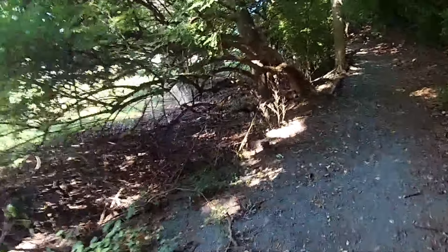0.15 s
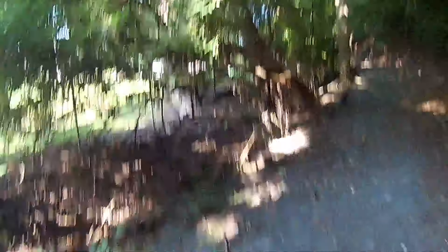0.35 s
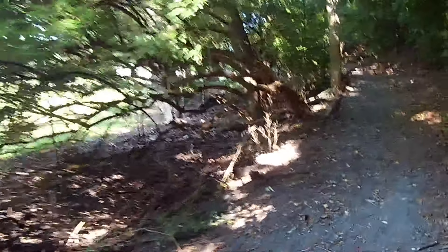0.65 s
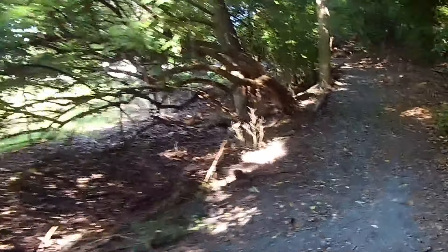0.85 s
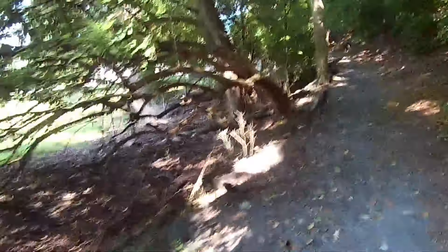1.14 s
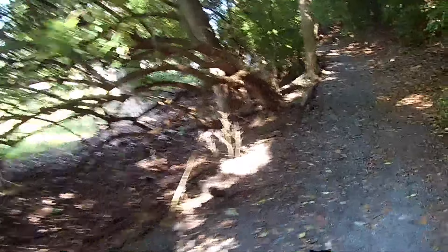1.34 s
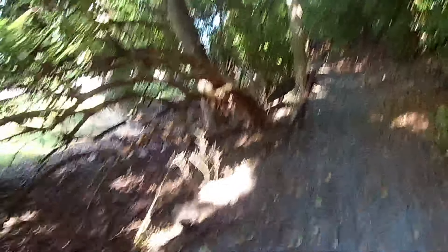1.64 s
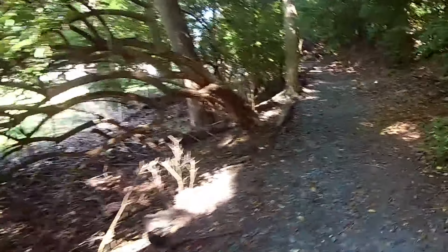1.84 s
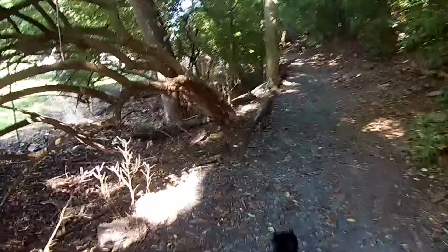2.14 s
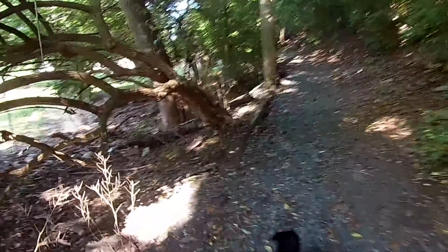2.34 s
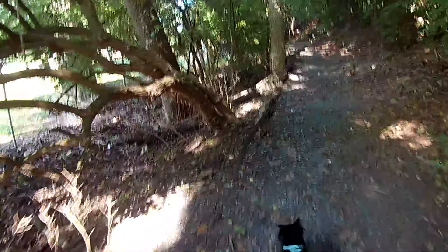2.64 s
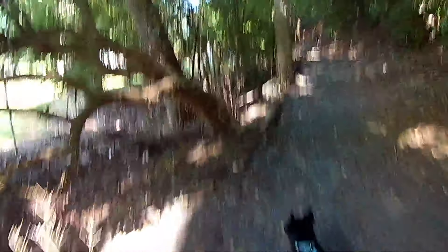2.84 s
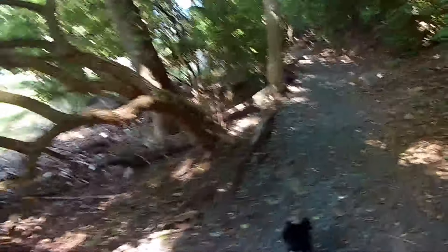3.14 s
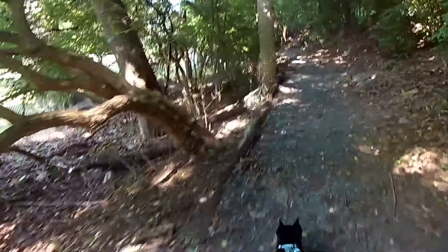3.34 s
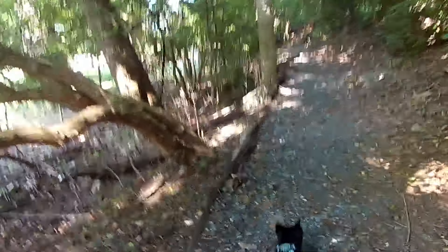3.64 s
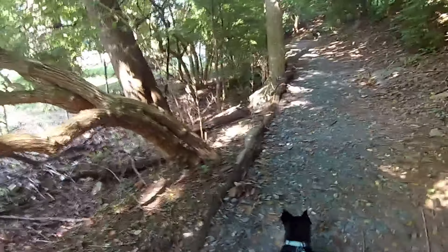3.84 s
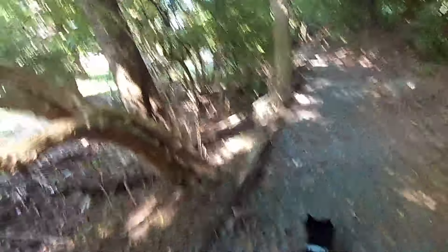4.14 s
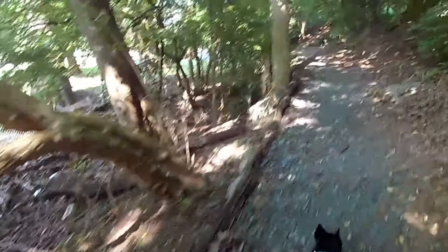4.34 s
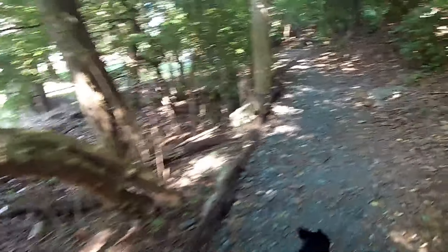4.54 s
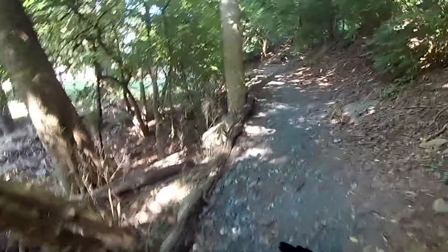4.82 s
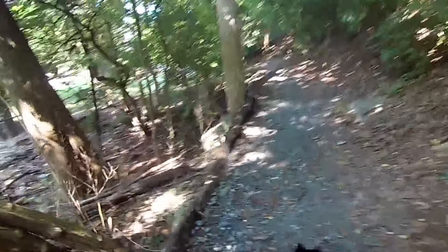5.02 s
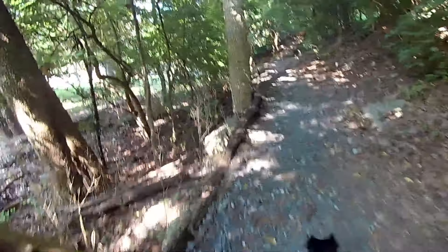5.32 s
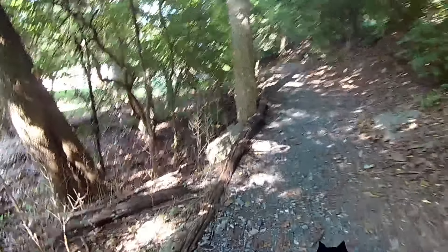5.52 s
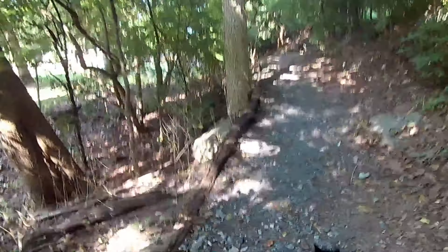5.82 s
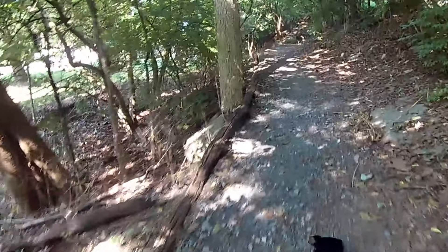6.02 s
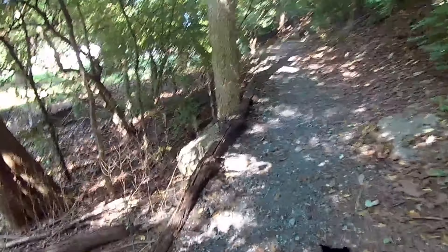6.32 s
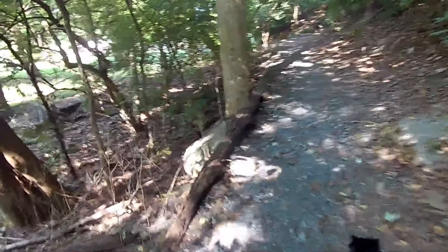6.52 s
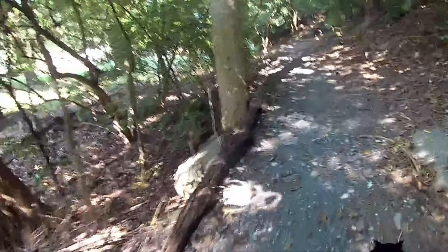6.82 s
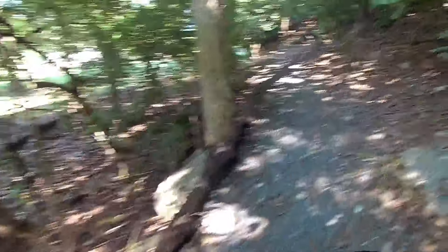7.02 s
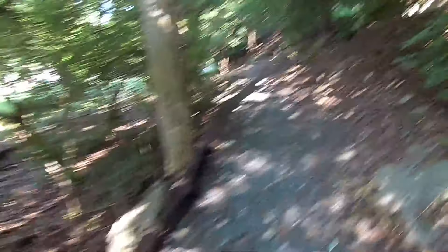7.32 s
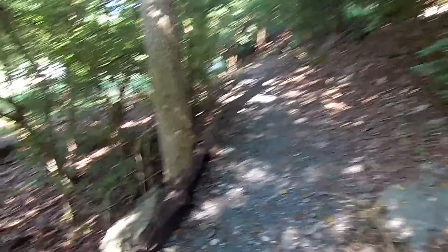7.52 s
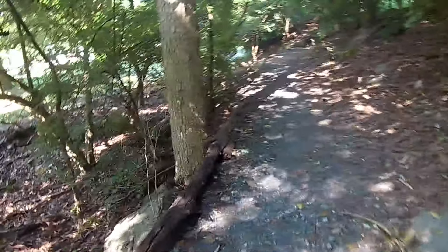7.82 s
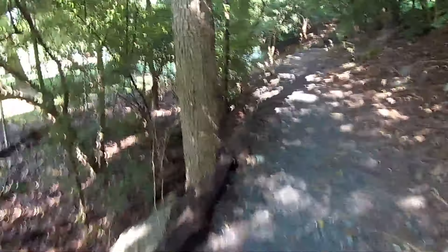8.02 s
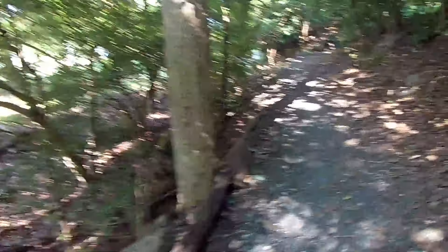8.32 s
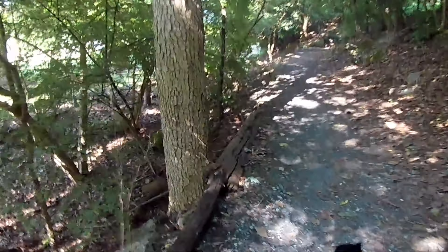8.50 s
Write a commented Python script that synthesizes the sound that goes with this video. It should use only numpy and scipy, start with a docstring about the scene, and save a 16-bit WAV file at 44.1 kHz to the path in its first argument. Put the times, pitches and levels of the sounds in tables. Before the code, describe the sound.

Heard through a covered microphone carried by the walker, even steps grind and crackle on a gravelly woodland path, about three every two seconds. Early on, a small metal tag on a leash gives a faint tink, and past the middle one stone snaps louder than the rest. The slightly dull crunching continues throughout, over a thin high hiss and a barely audible drone of far engines.

```python
"""A gravel trail under trees, where a walker is heard through the closed housing of a small camera.
Each step grinds a crowd of small stones, each a damped resonator, and snaps a few larger ones.
The housing acts as a low-pass filter on the crunch. A metal tag on a leash tinks in its free modes.
Under it lies the air of the woods: a far rumble with two engine drones, a thin broad hiss
and flickering bands of high hiss near 4 and 6 kHz."""
import sys
import numpy as np
from scipy import signal
from scipy.fft import rfft, irfft, next_fast_len
from scipy.io import wavfile

SR = 44100
rng = np.random.default_rng(int(sys.argv[2]) if len(sys.argv) > 2 else 0)


def bounce(signal):
    """Save signal as a 16-bit WAV file at the path given by the first command-line argument."""
    frames = np.transpose(np.atleast_2d(signal))
    limited = np.clip(frames, -1, 1)
    pcm = np.round(limited * 32767).astype(np.int16)
    wavfile.write(sys.argv[1], SR, pcm)


N = 381906

# wavering level of the low background noise: time_s, level_db
LOW_NOISE_LEVELS = [(0, -67), (.9, -67), (1.8, -71), (3.2, -65.5), (5.5, -73), (6.2, -62), (7.6, -64),
                    (8.66, -63)]
# two far engine drones: time_s, lower_hz, lower_db, upper_hz, upper_db
ENGINE_DRONES = [(0, 56, -63, 93.5, -66), (.7, 58, -62, 97, -64), (1, 57.3, -66, 106, -63.5),
                 (2.2, 74, -70, 106, -64.5), (2.8, 77.3, -65, 106, -66), (3.6, 70.4, -74, 107.7, -63.5),
                 (5.7, 56.5, -76, 115.7, -72.5), (6.5, 57.7, -66, 120.2, -63), (7.3, 57.96, -78, 97, -63),
                 (8.66, 60, -74, 93, -65)]
# spectrum of the air of the woods: frequency_hz, relative_density_db
AIR_SPECTRUM = [(12, -47), (20, -2.5), (53, -0.5), (100, -3), (160, -7), (300, -14), (600, -14.5),
                (1500, -14), (2200, -18), (3200, -20), (5000, -22.5), (7000, -29), (7800, -45.5),
                (8600, -44.5), (15500, -47)]
# bands in which stirring leaves vary the hiss: edge_hz
LEAF_BAND_EDGES = [400, 900, 1600, 2300, 3000, 3700, 5000, 7500]
# three flickering bands of high hiss: centre_hz, width_hz
HISS_BANDS = [(3750, 350), (4240, 500), (6050, 750)]
# levels of those bands: time_s, low_band_db, middle_band_db, high_band_db
HISS_LEVELS = [(0, -71.5, -63, -69.5), (.55, -75, -61.5, -74.5), (.75, -65, -61.5, -70.5),
               (1.3, -70, -63, -73), (1.6, -88, -63.5, -73.5), (2.5, -77, -66, -74.5),
               (3.1, -75, -64.5, -74.5), (3.68, -75, -61.5, -71), (3.759, -81, -66, -71.5),
               (4.799, -86, -65, -70), (5.2, -87, -64, -70), (5.7, -86, -62, -67),
               (6.299, -84, -64.5, -71.5), (7.1, -78, -64, -70), (8.2, -76, -63.5, -67),
               (8.66, -76, -63.5, -66.5)]
# blows on the metal tag: start_s, level_db
TAG_STRIKES = [(2.2732, -57.5), (2.2873, -67), (2.261, -75), (2.353, -75), (3.868, -81), (4.7815, -81)]
# free modes of the tag: pitch_hz, gain_db, t60_s
TAG_MODES = [(5900, 1, 0.094), (6090, 3.5, 0.12), (9930, -1, 0.063), (9992, 0, 0.12), (10160, -7, .06),
             (9400, -13, .04), (11650, -17, .04), (12400, -17, .03)]
# dry ticks close by: start_s, peak_db, rise_ms
DRY_TICKS = [(1.035, -85, 15), (1.6, -88, 15), (2.2114, -84, 6), (3.8681, -84, 9), (4.343, -77, 8),
             (4.4268, -82, 6), (4.7815, -87, 9), (5.3602, -89, 9), (5.565, -81, 20), (5.6825, -85, 8),
             (6.41, -76, 8.8), (6.8339, -85, 8), (8.0481, -81, 9), (8.1703, -75, 11)]
# footfalls, with rise and fall spanning 20 dB and the pitch given at mid hold:
# full_load_s, hold_s, grit_db, rise_s, fall_s, pitch_hz, heel_db
FOOTFALLS = [(0.364, 0.074, -47.5, 0.055, 0.11, 1230, -51.5), (1.025, 0.03, -43.5, 0.1, 0.032, 1260, -73),
             (1.606, 0.057, -44.5, 0.033, 0.14, 1190, -49.5), (2.227, 0.018, -43, 0.055, 0.13, 1360, -56),
             (2.799, 0.11, -47, 0.025, 0.09, 1114, -52.5), (3.472, 0.0055, -45, 0.0804, 0.099, 1040, -55),
             (4.037, 0.11, -46, 0.032, 0.097, 810, -47), (4.747, .005, -41.5, 0.051, 0.076, 960, -52.5),
             (5.367, 0.059, -44, 0.03, 0.11, 950, -54), (6.019, 0.038, -44, 0.032, 0.1, 920, -48.5),
             (6.67, 0.066, -47.5, 0.13, 0.2, 970, -47.5), (7.345, 0.0071, -46, 0.036, 0.29, 1220, -60),
             (7.988, 0.046, -47, 0.071, 0.047, 1040, -54), (8.586, 0.025, -56.5, 0.051, 0.089, 1200, -78)]
# further bursts of grit: middle_s, grit_db, fade_s, pitch_hz
# (fade_s spans 20 dB on either side and counts as at least 0.02 s)
# The brief one at 6.425 s surrounds a loud snap; the others are scuffs of the sole or toe.
GRIT_BURSTS = [(.5, -47.5, 0.13, 1250), (1.107, -49.5, 0.08, 1300), (1.458, -55, -0.7, 870),
               (1.76, -59, 0.5, 1250), (2.315, -47, -0.04, 1490), (2.36, -53.5, 0.58, 1630),
               (2.613, -80, 1, 940), (3.246, -50.5, 0.05, 965), (3.57, -49.5, -0.01, 1210),
               (3.991, -50, -0.48, 1100), (4.354, -64.5, 0.6, 1190), (4.857, -45, -0.22, 1220),
               (5.31, -54, -0.43, 1060), (5.585, -48, -0.14, 1430), (5.959, -48.5, -0.01, 1220),
               (6.164, -54, 0.23, 1130), (6.425, -42, 0, 1240), (6.777, -37.5, 0.0137, 1040),
               (6.84, -46.5, 0, 1160), (7.26, -58, 0.36, 1100), (7.48, -50, -0.14, 1450),
               (8.089, -46, 0.07, 1100)]
# larger stones and twigs snapping: time_s, body_db, pitch_hz, length_ms, edge_db
STONE_SNAPS = [(.034, -36.5, 1370, 1.1, -43), (0.27, -32, 1410, 1.04, -44), (0.301, -35.5, 1230, 0.56, -38),
               (0.356, -37, 1550, 1.4, -40), (0.4012, -34, 800, 0.71, -40), (0.39, -27, 1320, 0.39, -27),
               (0.422, -28, 1310, 0.36, -36), (0.4407, -19.5, 960, 0.67, -19),
               (0.4493, -23, 1300, 0.5, -38), (0.4724, -33, 1510, .88, -37), (.4865, -37, 1850, 1.2, -35),
               (0.502, -29, 1180, 0.36, -31), (.51, -28, 1280, 2.4, -11), (0.5165, -23, 1220, 0.53, -7),
               (.541, -25.5, 1420, 0.62, -33), (0.6209, -35.5, 1610, 1, -35), (.709, -41.5, 1950, 1.6, -35),
               (0.8637, -37, 1450, 0.44, -35), (0.986, -39, 1280, 0.5, -14), (1.0088, -19, 1693, 0.52, -25),
               (1.022, -32, 1510, 0.81, -30), (1.0285, -33, 1300, 0.43, -35), (1.038, -27, 990, 0.55, -35),
               (1.0468, -27, 1500, 0.73, -9), (1.0575, -34, 1100, 0.77, -28), (1.069, -40, 1600, 0.93, -24),
               (1.0496, -21.5, 970, 0.91, -11), (1.094, -28.5, 1400, 1.1, -35),
               (1.1053, -27.5, 1350, 0.8, -11), (1.2025, -34.5, 1010, 1.2, -38), (1.4, -30, 980, 0.84, -34),
               (1.5466, -28, 1440, 0.91, -35), (1.591, -39, 850, 0.64, -35), (1.6152, -30, 900, 2.2, -32),
               (1.627, -24.5, 900, 0.72, -38), (1.645, -29, 1110, 0.75, -38), (1.683, -37, 1410, 1.3, -24),
               (1.7472, -44, 1100, 0.86, -40), (1.6613, -27.5, 1050, 1.2, -41),
               (1.6943, -27, 1140, 1.35, -13), (1.7102, -31, 1660, 0.8, -15),
               (1.7675, -36.5, 1210, .97, -41), (2.185, -29, 1640, 0.51, -44),
               (2.213, -22, 1400, 0.89, -45), (2.2261, -29, 1540, 0.82, -36), (2.235, -29, 1590, 1.1, -39),
               (2.2555, -42, 1400, 0.77, -38), (2.3638, -36, 1400, 1.4, -38), (2.391, -38, 1510, 1.2, -36),
               (2.4678, -39.5, 1380, 0.89, -35), (2.611, -40, 1220, 0.91, -49),
               (2.6946, -34.5, 1310, .93, -40), (2.7538, -34, 1170, .92, -39),
               (2.8003, -36, 1400, 0.81, -40), (2.849, -33, 1200, 0.55, -40),
               (2.8254, -30.5, 960, 1.3, -38), (2.888, -34, 1140, 3, -42), (2.9169, -36, 1220, 0.73, -41),
               (2.9348, -34.5, 1450, 2.3, -37), (3.453, -37, 1910, 0.91, -35),
               (3.555, -41, 1900, 0.88, -35), (3.245, -31.5, 865, 0.36, -43), (3.312, -35, 1278, 0.69, -35),
               (3.4884, -29, 694, 1.6, -39), (3.497, -25, 1530, 0.59, -36), (4.033, -38.5, 970, 4.6, -39.5),
               (4.0445, -25, 765, 0.69, -40), (4.074, -40, 900, 2, -32), (4.13, -33, 1200, 1.7, -35),
               (4.1755, -40, 1200, 1.7, -40), (4.0846, -23, 970, 0.76, -17),
               (4.1187, -32.5, 1110, 5.3, -18), (4.1488, -32, 1090, 3.2, -38),
               (4.1936, -33.5, 1240, 1.4, -38), (4.3517, -42, 1490, 0.79, -14),
               (4.357, -36, 1490, 1.2, -8.5), (4.3726, -35.5, 1230, 0.66, -35),
               (4.4605, -47, 1590, 1.1, -42), (4.559, -39, 1396, .9, -38), (4.637, -38, 1430, 0.48, -42),
               (4.821, -38, 1400, 0.6, -42), (4.5913, -40, 1300, .8, -41), (4.682, -39, 1660, 0.58, -38),
               (4.749, -20, 1050, 0.44, -36), (4.7592, -20.5, 1230, 0.85, -39),
               (4.775, -25.5, 1050, 0.75, -46), (4.853, -27.5, 1630, 0.33, -14),
               (4.9436, -38.5, 1520, 0.75, -42), (5.2057, -29.5, 1470, 1, -42),
               (5.273, -24.5, 1090, 1.25, -44), (5.358, -37, 1500, 1.2, -40), (5.368, -32, 610, 4.7, -34),
               (5.3782, -26, 1000, 0.37, -36), (5.388, -35, 1700, 0.55, -35),
               (5.3985, -26.5, 1090, 0.86, -37), (5.4097, -26.5, 740, 0.87, -35),
               (5.429, -28, 1500, .45, -19), (5.438, -22.5, 1220, 1.8, -36), (5.455, -33, 1800, .5, -28),
               (5.4625, -32, 1300, 0.48, -35), (5.514, -33, 895, 1.7, -40), (5.48, -29, 1140, 0.67, -14),
               (5.5215, -28, 1050, 0.7, -13), (5.817, -30, 780, 1.15, -45), (5.8735, -36, 1800, 0.91, -34),
               (5.9654, -34.5, 1320, 0.79, -39), (6.015, -37, 935, 3.5, -38),
               (6.0524, -29, 1180, 0.89, -40), (6.0655, -34, 950, 1.5, -40), (6.0738, -28, 710, 1.8, -42),
               (6.0835, -30, 1060, 0.99, -40), (6.034, -26.5, 895, 0.4, -40), (6.1225, -35, 1210, 1.2, -40),
               (6.138, -34, 1200, .9, -40), (6.19, -39.5, 2160, 0.86, -24), (6.306, -41, 1150, 1.3, -44),
               (6.376, -37, 1010, 1.23, -44), (6.166, -31, 1190, 0.96, -18),
               (6.2936, -42.5, 1040, 2.4, -44), (6.4236, -14, 1200, 0.84, -47),
               (6.4791, -34, 1060, 0.87, -36), (6.5134, -27.5, 910, 1.5, -34),
               (6.514, -33.5, 1890, 1.5, -34), (6.534, -18, 1160, 0.61, -38), (6.654, -34, 690, 1.5, -38),
               (6.662, -37, 650, 1.1, -44), (6.7017, -29, 1200, 0.89, -40), (6.756, -31, 1100, 1, -40),
               (6.795, -28, 1110, 0.97, -40), (6.6829, -27.5, 864, 0.99, -26),
               (6.6971, -24.5, 1020, 0.65, -14), (6.7145, -29.5, 940, 1.3, -41),
               (6.761, -22.5, 1020, 1.4, -38), (6.767, -23, 1150, 0.72, -41),
               (6.777, -25.5, 1080, 0.93, -40), (6.7862, -18.5, 785, 0.95, -34),
               (6.83, -28, 920, 0.45, -37), (6.836, -32, 990, 0.45, -16), (7.1652, -31, 1190, 0.84, -37),
               (7.2074, -38, 674, 1.6, -36), (7.2246, -26, 1470, 0.54, -34), (7.243, -33, 1280, 0.79, -35),
               (7.2614, -32.5, 960, 0.78, -44), (7.292, -36, 1100, 0.83, -38),
               (7.2955, -31, 1220, 0.88, -34), (7.3198, -28.5, 1020, 0.38, -43),
               (7.33, -37, 1094, 0.91, -40), (7.3503, -29, 910, 1.7, -20), (7.3646, -23, 895, 1, -14),
               (7.377, -29, 1430, 0.61, -11), (7.388, -37, 1500, 0.83, -14),
               (7.4208, -29.5, 1325, 0.66, -20), (7.4356, -35, 1190, 2.3, -37),
               (7.473, -36, 1710, 0.77, -13), (7.481, -33, 1470, 0.63, -40), (7.46, -35, 1100, 0.69, -42),
               (7.487, -37.5, 1200, 1, -40), (7.5158, -31.5, 2100, 0.88, -39),
               (7.916, -33.5, 1230, 0.95, -39), (7.949, -33, 1096, 1.1, -46), (7.955, -31, 1140, 1.6, -41),
               (7.977, -35, 1600, .6, -30), (7.9985, -44, 900, 2, -44), (8.022, -29, 900, .8, -40),
               (8.029, -33, 905, 1.3, -42), (8.0405, -32, 1300, 0.88, -40),
               (8.0516, -19.5, 1500, 0.61, -30), (8.077, -31, 1330, 0.49, -16),
               (8.0875, -27, 860, 1.4, -40), (8.1045, -22.5, 1270, 1.3, -38), (8.125, -33, 1220, 1.4, -37),
               (8.141, -34, 1300, 1, -40), (8.556, -38, 1410, 0.94, -40), (8.568, -40.5, 1300, 0.62, -40),
               (8.627, -41, 1700, 0.64, -36), (8.5911, -29, 1390, 0.64, -28)]


def amp(db):
    """Amplitude grows tenfold for every 20 dB."""
    return 10 ** (np.asarray(db) / 20)


def unit_rms(x):
    """Division by the rms value gives a signal unit power."""
    return x / np.sqrt(np.mean(x ** 2) + 1e-20)


def curves(rows):
    """Linear interpolation in time turns each later column into one value per sample."""
    times_s, *columns = np.transpose(rows)
    return [np.interp(np.arange(N) / SR, times_s, column) for column in columns]


def drift(rate_hz):
    """Low-pass filtered noise fluctuates slowly, here with unit rms."""
    hop, run_in = 40, 2000
    pole = np.exp(-2 * np.pi * hop * rate_hz / SR)
    noise = rng.standard_normal(N // hop + run_in + 2)
    slow = signal.lfilter([1], [1, -2 * pole, pole * pole], noise)[run_in:]
    return np.interp(np.arange(N) / hop, np.arange(len(slow)), unit_rms(slow))


def ring(force, hz, t60_s):
    """A damped resonator answers a unit impulse with a sine decaying from height 1."""
    radius, angle = amp(-60 / (t60_s * SR)), 2 * np.pi * hz / SR
    return signal.lfilter([0, np.sin(angle)], [1, -2 * radius * np.cos(angle), radius ** 2], force + 1e-18)


def band(x, low_hz, high_hz, order=2):
    """A Butterworth band-pass attenuates what lies outside its two edges."""
    return signal.sosfilt(signal.butter(order, [low_hz, high_hz], "band", fs=SR, output="sos"), x)


def far_rumble(waver_hz=2.7):
    """Random modulation broadens two gliding engine tones within a band of low noise."""
    level_db, = curves(LOW_NOISE_LEVELS)
    lower_hz, lower_db, upper_hz, upper_db = curves(ENGINE_DRONES)
    out = amp(level_db) * unit_rms(band(rng.standard_normal(N), 61, 103))
    for hz, db in ((lower_hz, lower_db), (upper_hz, upper_db)):
        phase = 2 * np.pi * np.cumsum(hz) / SR
        in_phase, quadrature = 1 + .35 * drift(waver_hz), .35 * drift(waver_hz)
        out += amp(db) * (in_phase * np.sin(phase) + quadrature * np.cos(phase))
    return out


def woodland_air(level_db, flutter_db):
    """Broadband noise, coloured by the housing, is modulated band by band as leaves stir."""
    size = next_fast_len(N)
    hz = np.maximum(np.arange(size // 2 + 1) * SR / size, 1)
    knots_hz, density_db = np.transpose(AIR_SPECTRUM)
    colour = amp(np.interp(np.log(hz), np.log(knots_hz), density_db))
    spectrum = rfft(rng.standard_normal(size)) * colour
    out = irfft(spectrum, size)[:N]
    for low_hz, high_hz in zip(LEAF_BAND_EDGES, LEAF_BAND_EDGES[1:]):
        leaves = irfft(spectrum * (hz >= low_hz) * (hz < high_hz), size)[:N]
        out += leaves * (amp(flutter_db * drift(14)) - 1)
    return amp(level_db) * unit_rms(out)


def high_hiss():
    """Random amplitude modulation makes three bands of noise near 4 and 6 kHz flicker."""
    out = 0
    for level_db, (hz, width_hz) in zip(curves(HISS_LEVELS), HISS_BANDS):
        hiss = band(rng.standard_normal(N), hz - width_hz / 2, hz + width_hz / 2, order=1)
        hiss = band(hiss, hz - width_hz, hz + 0.79 * width_hz)
        out += amp(level_db + 1.73 * drift(22)) * unit_rms(hiss)
    return out


def leash_tag(contact_s=0.0015):
    """A struck metal tag rings in inharmonic modes, which build up over the contact time."""
    blows = np.zeros(N)
    for start_s, db in TAG_STRIKES:
        blows[round(start_s * SR)] = amp(db)
    out = 0
    for hz, db, t60_s in TAG_MODES:
        # spread the blow in time while keeping the height of the ring
        force = 2 / (contact_s * SR) * ring(blows, hz, np.log(1000) * contact_s)
        out += amp(db) * ring(force, hz, t60_s)
    return out


def ground_and_housing(x, delay_s=0.001166, reflection_db=-19, cutoff_hz=2330):
    """Ground reflection adds a delayed copy; the housing transmits little above its cutoff."""
    reflection = amp(reflection_db) * np.interp(np.arange(N) - delay_s * SR, np.arange(N), x)
    return signal.sosfilt(signal.butter(5, cutoff_hz, fs=SR, output="sos"), x + reflection)


def pressing(t, db, rise_s, fall_s, hold_s=0):
    """Power grows exponentially up to t = 0, holds and decays; rise_s and fall_s each span 20 dB."""
    drop_db = 20 * np.maximum(-t / rise_s, (t - hold_s) / fall_s).clip(0, 5)
    return amp(2 * (db - drop_db))


def gait(roll_octaves_per_s=4.5, roll_s=0.72, hop=32):
    """Incoherent powers add, giving grit level, power-weighted mean pitch and tread level."""
    t = np.arange(0, N + hop, hop) / SR
    power, heel_power = amp(2 * -76.5), amp(2 * -68.5)   # the ground settling between steps
    weighted_hz = power * 1300
    for load_s, hold_s, db, rise_s, fall_s, hz, heel_db in FOOTFALLS:
        age_s = t - load_s
        step = pressing(age_s, db, rise_s, fall_s, hold_s)
        # the pitch rises as the foot rolls from heel to toe
        rolled_hz = hz * 2 ** (roll_octaves_per_s * (age_s.clip(0, roll_s) - hold_s / 2))
        power += step
        weighted_hz += step * rolled_hz
        heel_power += pressing(age_s, heel_db, rise_s=0.021, fall_s=0.11)
    for middle_s, db, fade_s, hz in GRIT_BURSTS:
        fade_s = max(fade_s, .02)
        burst = pressing(t - middle_s, db, fade_s, fade_s)
        power += burst
        weighted_hz += burst * hz
    return curves(np.transpose([t, 10 * np.log10(power), weighted_hz / power, 10 * np.log10(heel_power)]))


def rustle(grit_db):
    """Leakage past the housing admits faint treble from each step and from dry ticks close by."""
    t = np.arange(N) / SR
    envelope = amp(grit_db - 42.5)
    for start_s, db, rise_ms in DRY_TICKS:
        age = np.maximum(t - start_s, 0) * 1000 / rise_ms
        envelope += amp(db) * age * np.exp(1 - age)
    return envelope * unit_rms(band(rng.standard_normal(N), 7700, 12300))


def tread(level_db):
    """Ground settling under the foot's weight radiates dull, uneven low-frequency noise."""
    return amp(level_db + 0.92 * drift(30)) * unit_rms(band(rng.standard_normal(N), 134, 410))


def snaps(size=768):
    """A sudden release of stress gives a swing or two of the ground, a rattle and a sharp edge."""
    body, clicks = np.zeros(N + 2 * size), np.zeros(N)
    t = np.arange(size) / SR
    for time_s, body_db, hz, length_ms, edge_db in STONE_SNAPS:
        rise_s = max(length_ms, .4) / 850
        envelope = (t / rise_s * np.exp(1 - t / rise_s)) ** 8
        swing = -envelope * np.cos(2 * np.pi * hz * (t - rise_s))
        impacts = amp(-29) * rng.standard_normal(size) * np.exp(-t / 0.0068) * (t > rise_s)
        impacts[0] = 1   # the break itself, ahead of its fragments
        start = round((time_s - rise_s - .0005) * SR)
        body[start:start + 2 * size - 1] += amp(body_db) * np.convolve(impacts, swing)
        clicks[round((time_s - .0006) * SR)] = amp(edge_db)
    edge = band(clicks, 2330, 2670, order=3) + amp(-12.5) * band(clicks, 3100, 4630, order=3)
    return ground_and_housing(band(body[:N], 273, 8000)) + edge


def grit(level_db, pitch_hz, slips_per_s, spread_db, cycles, width_octaves):
    """Stones slip as a Poisson process; each rings a few cycles, most strongly near pitch_hz."""
    force = amp(spread_db * np.minimum(rng.exponential(1, N), 4)) * rng.choice([-1, 1], N)
    slips = rng.random(N) < slips_per_s / SR
    modes_hz = np.geomspace(425, 2460, 14)
    stone = rng.integers(0, len(modes_hz), N)
    pitch_ratio = modes_hz[stone] / pitch_hz
    weight = np.exp(-.5 * (np.log2(pitch_ratio) / width_octaves) ** 2)
    impacts = force * slips * weight * np.sqrt(pitch_ratio)   # offsets the shorter ring of small stones
    rings = 0
    for k, hz in enumerate(modes_hz):
        # a soft contact: two passes through the resonance let the ring build before it dies
        contact = ring(impacts * (stone == k), hz, cycles / hz)
        rings += hz / SR * ring(contact, hz, cycles / hz)
    crunch = ground_and_housing(band(rings, 543, 6700))
    return amp(level_db + 0.25 * drift(55)) * unit_rms(crunch)


def scene():
    """The pressures of steps, tag and background superpose at one microphone."""
    grit_db, pitch_hz, tread_db = gait()
    stones = grit(grit_db, pitch_hz, slips_per_s=1250, spread_db=2.5, cycles=4.8, width_octaves=0.86)
    cracks = grit(grit_db - 13.5, pitch_hz, slips_per_s=110, spread_db=-0.5, cycles=2, width_octaves=0.85)
    loose_pebbles = grit(-68, 1420, slips_per_s=60, spread_db=1.5, cycles=1.7, width_octaves=0.32)
    steps = stones + cracks + loose_pebbles + tread(tread_db) + snaps() + rustle(grit_db)
    background = high_hiss() + woodland_air(level_db=-56.5, flutter_db=2.5) + far_rumble()
    return (background + leash_tag() + steps)[None]


def record(dry, cutoff_hz=15660):
    """A steep elliptic low-pass limits the bandwidth."""
    return signal.sosfilt(signal.ellip(14, .1, 40, cutoff_hz, fs=SR, output="sos"), dry)


dry = scene()
out = record(dry)
bounce(out)
```